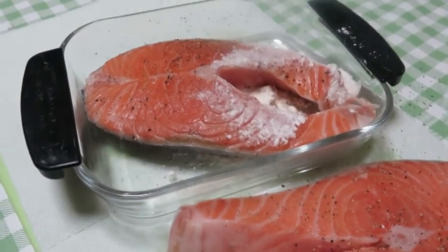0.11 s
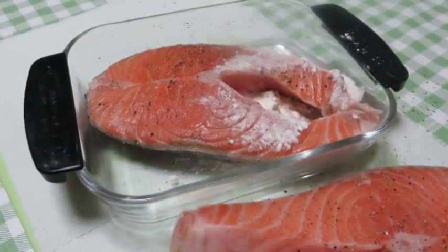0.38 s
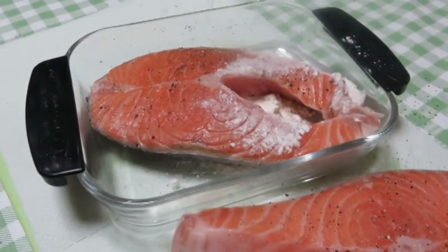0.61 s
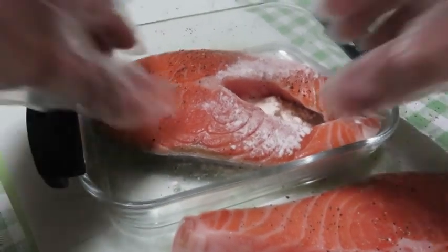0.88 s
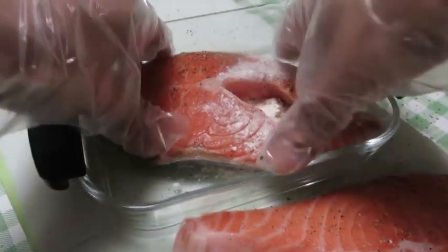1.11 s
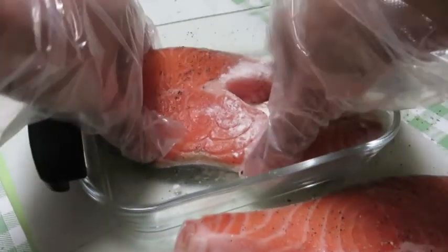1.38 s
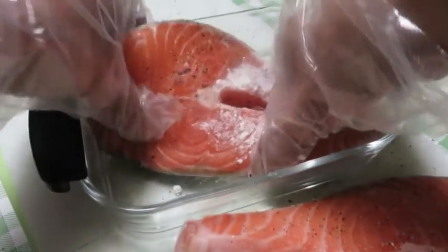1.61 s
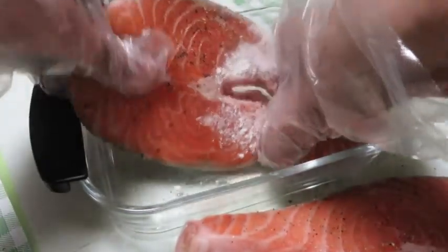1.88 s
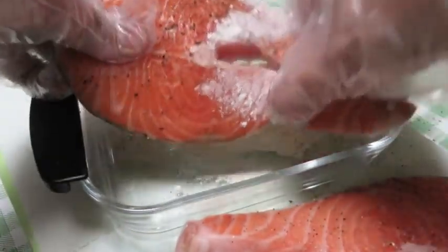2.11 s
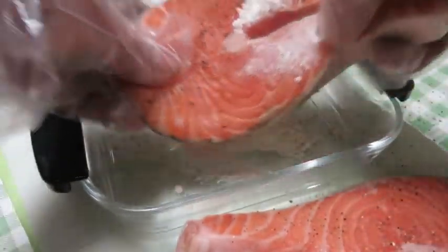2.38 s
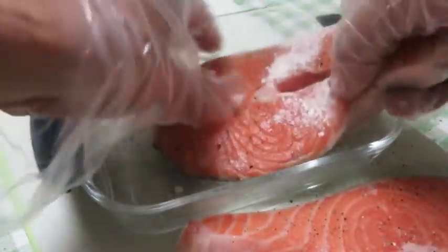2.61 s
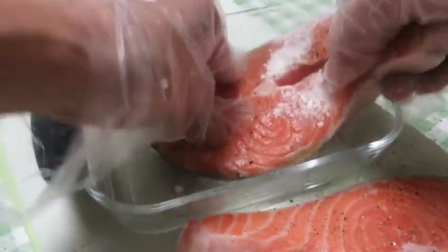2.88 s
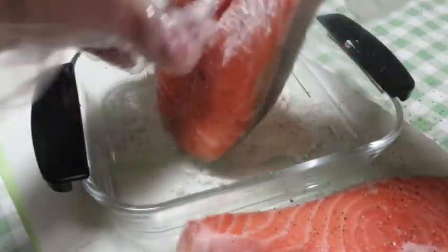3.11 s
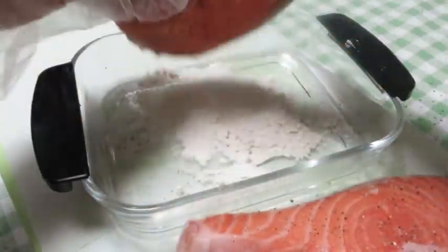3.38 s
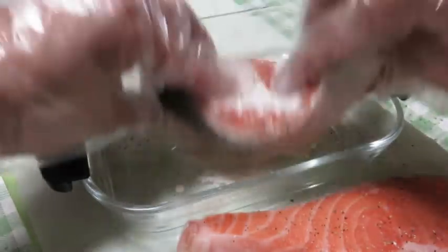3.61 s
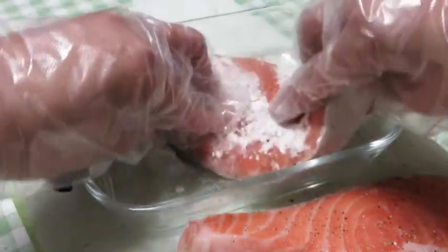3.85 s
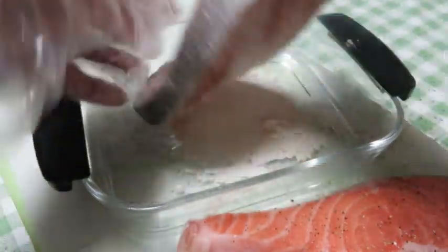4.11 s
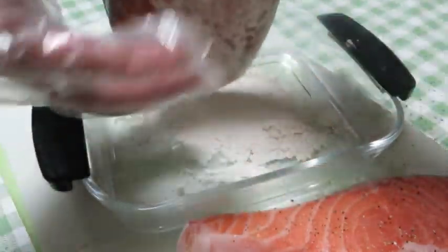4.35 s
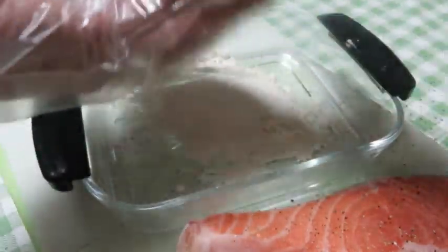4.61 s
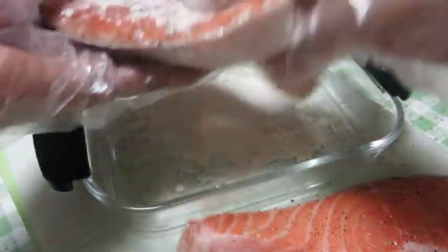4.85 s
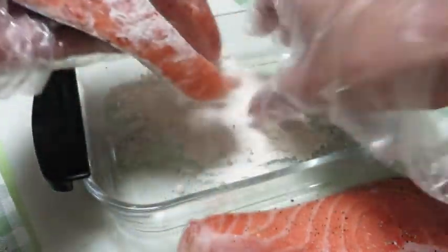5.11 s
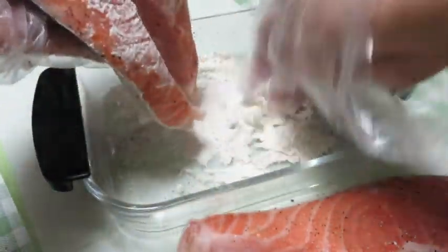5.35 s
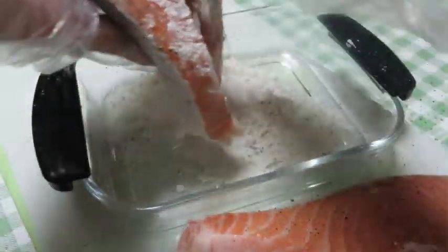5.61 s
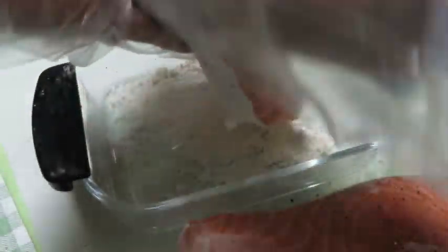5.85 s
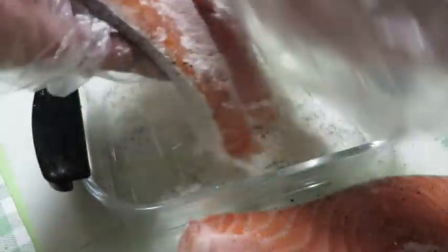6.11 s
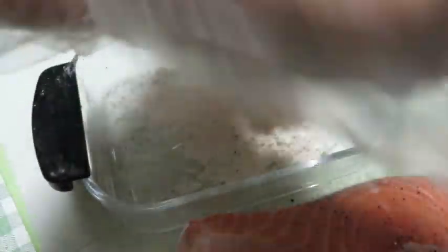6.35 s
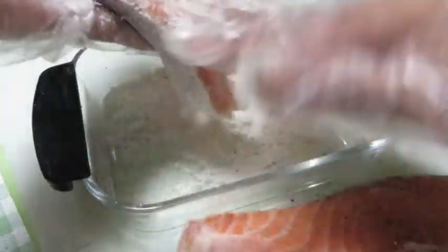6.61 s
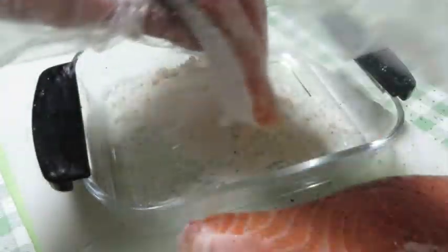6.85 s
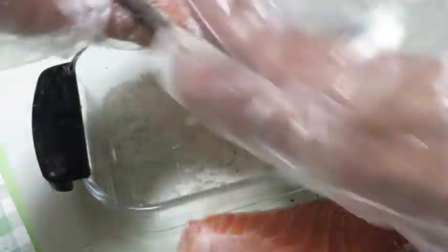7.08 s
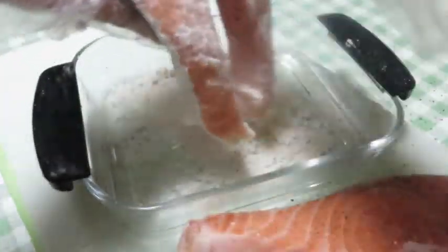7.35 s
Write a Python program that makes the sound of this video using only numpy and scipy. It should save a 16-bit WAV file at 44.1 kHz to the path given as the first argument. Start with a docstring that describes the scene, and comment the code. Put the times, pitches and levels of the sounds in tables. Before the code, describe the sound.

Crisp, crackling plastic film on busy hands rubbing flour onto fish, with two brief lulls, in a small quiet kitchen.

```python
"""Thin plastic gloves crinkle close to a camera while hands turn and rub a piece of fish over a glass dish.
It opens off to one side with separate snaps and a few low pats; within a second a dense rustle swells up.
Creases in the film buckle as short ringing clicks: fine ticks, broad folds, a dull palm and loud single snaps.
The rustle thins briefly near 4.1 s and eases near 6.3 s, then goes on to the end. Fingers pat the flesh and bump
the dish as damped low sines; filtered noise makes the rubbing rumble and the floor of a small quiet kitchen."""
import sys
import numpy as np
from scipy import signal
from scipy.fft import rfft, irfft, next_fast_len
from scipy.io import wavfile
from scipy.ndimage import map_coordinates

SR = 44100
rng = np.random.default_rng(int(sys.argv[2]) if len(sys.argv) > 2 else 0)


def nominal_scale(level):
    """Amplitude ratio for a level in decibels (scalar or array-like)."""
    x = np.asarray(level, float) / 20
    return 10 ** x


def put_to_file(sound):
    """Save the sound as 16-bit audio at rate SR, in the file named by the first command-line argument."""
    columns = np.atleast_2d(sound).T  # one column per channel
    safe = np.clip(columns, -1, 1)
    whole_steps = np.round(safe * 32767)
    wavfile.write(sys.argv[1], SR, whole_steps.astype(np.int16))


N = 329458


def unit(x):
    """Scaled to rms 1."""
    return x / np.sqrt(np.mean(x ** 2) + 1e-20)


def along(points, hz):
    """Reads (frequency [Hz], value) points on a log frequency axis."""
    f, v = np.transpose(points)
    return np.interp(np.log(hz + 1), np.log(f + 1), v)


def over_time(rows, s):
    """Each column after the time, read at the moments s."""
    at, *cols = np.transpose(rows)
    return [np.interp(s, at, c) for c in cols]


def wobble(rate):
    """A smooth random curve of rms 1, rate knots a second."""
    knots = rng.standard_normal(int(N * rate / SR) + 4)
    return unit(map_coordinates(knots, [np.arange(N) * rate / SR]))


def filtered(x, response):
    """Multiplies the spectrum of x by a complex response of frequency."""
    m = next_fast_len(N + 8192)
    return irfft(rfft(x, m) * response(np.fft.rfftfreq(m, 1 / SR)), m)[..., :N]


def noise(spectrum):
    """Unrelated mid and side noise of one colour, at rms 1."""
    return unit(filtered(rng.standard_normal((2, N)), lambda hz: nominal_scale(along(spectrum, hz))))


def radiated(x, low_hz):
    """A small patch of film moves little air at low pitch: a second-order high-pass."""
    return filtered(x, lambda hz: (1j * hz / (low_hz + 1j * hz)) ** 2)


def clicks(s, gain, hz, t60, aside, size, rise=0.0023):
    """Damped sines summed at their times; the side row weighs each by its direction."""
    t, t60 = np.arange(size) / SR, t60[:, None]
    swing = np.sin(2 * np.pi * np.clip(hz, 40, 16000)[:, None] * t)
    onset = 1 - np.exp(-t / (rise * t60))  # rise is a share of the ring time
    ring = swing * nominal_scale(-60 * t / t60) * onset * gain[:, None]
    start = np.round(np.clip(s, 0, N / SR) * SR).astype(int)
    at = (start[:, None] + np.arange(size)).ravel()
    return np.array([np.bincount(at, (ring * w).ravel(), N + size)[:N] for w in (1, aside[:, None])])


def crackle(centre_hz, octaves, cycles, spread_db, low_hz, rise, count, size):
    """Many creases buckle at random: log-normal pitch and ring time, exponential spread of level in dB."""
    u, z = rng.random((count, 2)), rng.standard_normal((count, 4))
    at = (u[:, 0] * N).astype(int)
    pitch = 2 ** (octaves * z[:, 0])
    size_db = spread_db * np.minimum(-np.log(1 - u[:, 1]), 4)
    gain = pitch ** 0.8 * nominal_scale(size_db) * np.sign(z[:, 2])  # quicker snaps push the air harder
    hz = centre_hz[at] * pitch
    life = cycles * np.exp(0.26 * z[:, 3]) / hz
    aside = 0.36 + 0.47 * z[:, 1]
    grains = radiated(clicks(at / SR, gain, hz, life, aside, size, rise), low_hz)
    return grains / np.std(grains[0])


def hands(now):
    """Hand motion: power of the steady rustle, level of the folds, and clumps shared by film and rumble."""
    # rustle of the moving hands: (time [s], drive of the creases [dB], broad folds against them [dB])
    motion = [(0, -52, 6.5), (.3, -57, -5), (.49, -52, 4.5), (.53, -47, 2.5), (.63, -62, -2),
              (.75, -52, -2.5), (.93, -37.5, -2.5), (1.15, -32.5, -4), (1.6, -29, -3.5), (2.1, -34, -5),
              (2.32, -36.5, -2), (2.45, -29.5, -3.5), (2.95, -29.5, -4), (3.08, -37.5, -4.5),
              (3.2, -29, -4.5), (3.95, -33.5, -6.5), (4.07, -49, -6), (4.135, -36.5, -1.5),
              (4.175, -30.5, -5), (4.6, -38.5, -3), (4.75, -33.5, -4.5), (5.75, -32.5, -6),
              (6.13, -32.5, -4.5), (6.24, -49, -4.5), (6.31, -74, -16), (6.4, -51, -2), (6.5, -28, -4.5),
              (6.68, -35, -4.5), (7.0, -35, -8), (7.2, -31, -4), (7.47, -36, -7.5)]
    rustle_db, folds_db = over_time(motion, now)
    steady = nominal_scale(1.969 * (rustle_db + 0.69 * wobble(45)))  # power, so nearly twice the dB
    clump_db = 0.3 * wobble(45) + 1.25 * wobble(130)
    return steady, folds_db, clump_db


def squeezes(now):
    """Power of the bursts as a grip crumples the film: each climbs to a peak and falls at a steady dB rate."""
    # grips: (time of the peak [s], level [dB], rise over 10 dB [s], fall over 10 dB [s])
    grips = [(.25, -44.5, 0.044, 0.017), (.59, -29, 0.059, 0.022), (.66, -25.5, 0.042, 0.031),
             (.96, -30.5, 0.16, 0.02), (1.19, -24.5, 0.16, 0.017), (1.31, -27, 0.19, 0.048),
             (1.44, -31.5, 0.037, 0.052), (1.71, -31, 0.14, 0.098), (1.88, -23, 0.074, 0.03),
             (1.98, -25, 0.14, 0.082), (2.09, -25, 0.055, 0.049), (2.43, -27.5, 0.091, 0.04),
             (2.465, -25.5, 0.025, 0.034), (2.505, -26, 0.03, 0.026), (2.76, -28, 0.059, 0.077),
             (2.9, -27, 0.058, 0.036), (2.97, -27, 0.039, 0.067), (3.18, -30, 0.027, 0.12),
             (3.3, -26, 0.048, 0.055), (3.62, -32.5, 0.089, 0.1), (3.86, -24.5, 0.04, 0.049),
             (3.998, -24, 0.055, 0.03), (4.017, -25.5, 0.023, 0.022), (4.229, -38, 0.12, 0.046),
             (4.41, -26.5, 0.027, 0.1), (4.68, -27, 0.016, 0.026), (4.77, -26.5, 0.026, 0.071),
             (4.866, -17.5, .004, 0.021), (4.925, -23.5, 0.12, 0.046), (4.98, -26.5, 0.05, 0.023),
             (5.089, -23, 0.046, 0.077), (5.28, -29, 0.88, 0.17), (5.453, -23.5, 0.063, 0.024),
             (5.54, -26.5, 0.033, 0.081), (5.998, -23, 0.16, 0.26), (6.44, -26.5, 0.015, 0.15),
             (6.563, -20, 0.022, 0.058), (6.86, -27, 0.085, 0.15), (7.05, -30.5, 0.016, 0.15),
             (7.133, -16, 0.019, 0.023), (7.23, -23.5, 0.043, 0.12), (7.37, -22, 0.03, 0.086),
             (7.449, -21, 0.0082, 0.035)]
    power = np.zeros(N)
    for s, db, rise, fall in grips:
        below_peak = np.maximum((s - now) / rise, (now - s) / fall)
        power += nominal_scale(2 * (db - 10 * below_peak))
    return power


def fine_creases(steady, burst):
    """Small creases tick high, with scattered middling pops among them."""
    # neighbouring creases share a patch of film, so their pitch drifts together
    centre_hz = 7000 * 2 ** (0.14 * wobble(40))
    ticks = crackle(centre_hz, 0.75, cycles=4.4, spread_db=1.6, low_hz=1560, rise=0.09, count=34000, size=96)
    pops = crackle(np.full(N, 8200), 0.53, cycles=4.5, spread_db=2.2, low_hz=2500, rise=0.044,
                   count=1100, size=128)
    ticks = np.sqrt(steady + burst) * nominal_scale(0.59 * wobble(25)) * ticks
    return ticks + np.sqrt(steady + 0.35 * burst) * nominal_scale(-6) * pops


def broad_folds(steady, burst, folds_db):
    """Larger bends of the film ring lower and longer, as a crunch."""
    centre_hz = 2650 * 2 ** (0.16 * wobble(22))
    folds = crackle(centre_hz, 0.5, cycles=8.2, spread_db=0.5, low_hz=800, rise=0.06, count=11000, size=256)
    strength = np.sqrt(steady + nominal_scale(2 * -1) * burst)  # bursts count 1 dB less here
    return strength * nominal_scale(folds_db + 0.31 * wobble(25)) * folds


def palm_crunch(steady, burst, folds_db):
    """The palm of the glove flexes as one sheet: a dull crunch under the creases."""
    centre_hz = 902 * 2 ** (0.26 * wobble(12))
    crunch = crackle(centre_hz, 0.53, cycles=5.3, spread_db=-0.5, low_hz=300, rise=0.089, count=6000, size=384)
    return np.sqrt(steady + burst) * nominal_scale(folds_db - 14.5 + 2.44 * wobble(8)) * crunch


def snaps():
    """A loud crease buckles: a sharp click and a shorter one near its pitch, then smaller ones as it settles."""
    # loudest single creases: (time [s], level [dB], pitch [Hz])
    creases = [(0.0782, -8.5, 6800), (.0953, -13.5, 6750), (.107, -35, 5940), (.124, -23, 9000),
               (.1354, -21.5, 4140), (.2165, -24, 4020), (0.2496, -21, 2710), (0.2562, -17, 4430),
               (0.337, -11.5, 3900), (.347, -23, 1500), (.365, -19.5, 4230), (0.4189, -17.5, 5130),
               (0.476, -21, 2820), (0.5083, -0.5, 5150), (0.5127, -15, 6540), (.517, -15, 5400),
               (0.5213, -5.5, 8800), (.5314, -16, 5200), (.552, -11.5, 2450), (.555, -21, 4900),
               (.5898, -8.5, 1830), (.5915, -3.5, 6000), (.6181, -20, 5600), (.65, -6, 5560),
               (1.0006, -8.5, 6900), (1.107, -9, 2980), (1.181, -3, 4800), (1.234, -10, 10800),
               (1.247, -6, 10500), (1.28, -7, 9400), (1.306, -9, 8000), (1.41, -7, 8800),
               (1.426, -10, 10000), (1.77, -7, 10400), (1.9787, -6, 8100), (2.0528, -10, 5500),
               (2.1505, -13, 8500), (2.1694, -5.5, 4830), (2.179, -15, 4300), (2.373, -8, 9500),
               (2.5123, -10, 8200), (2.8612, -22, 7100), (2.882, -10, 5000), (2.901, -7, 7000),
               (2.907, -8, 7500), (2.926, -6.5, 5000), (3.041, -8, 8700), (3.088, -9, 5170),
               (3.128, -8, 7700), (3.143, -16, 2280), (3.161, -4, 10500), (3.161, -6, 4770),
               (3.2084, -12, 7500), (3.3154, -5, 7450), (3.326, -8, 9000), (3.357, -11, 8500),
               (3.7015, -5, 9900), (3.8149, -10, 8200), (3.94, -8.5, 8540), (4.018, -11, 3000),
               (4.049, -14.5, 8000), (4.0947, -20, 7800), (4.103, -16, 7740), (4.121, -18, 7000),
               (4.144, -11.5, 7000), (4.1511, -8, 7200), (4.1555, -9, 9600), (4.16, -15, 9500),
               (4.2017, -5, 6500), (4.225, -11, 7000), (4.243, -16, 7500), (4.3326, -6, 8150),
               (4.672, -7, 9100), (4.7192, -5, 9500), (4.8625, -6, 7300), (4.8648, -9, 9500),
               (4.867, -14, 7240), (4.898, -12, 3000), (4.929, -12, 9000), (4.985, -9, 5930),
               (5.006, -14, 9000), (5.2135, -11, 6740), (5.227, -6, 9300), (5.271, -8, 6200),
               (5.2757, 0.5, 7460), (5.4502, -6, 3270), (5.5407, -14, 8300), (5.738, -6.5, 9200),
               (5.805, -11, 6800), (5.9305, -3, 5600), (5.9945, -3, 7500), (6.0304, -4, 2610),
               (6.0463, -2, 6200), (6.07, -10, 6200), (6.117, -3, 8400), (6.139, -12, 7500),
               (6.1475, -9, 9700), (6.351, -26, 9550), (6.359, -25, 9500), (6.364, -30, 7000),
               (6.371, -23, 4900), (6.379, -19, 8850), (6.38, -18, 2950), (6.398, -21, 4320),
               (6.41, -16, 7000), (6.414, -14, 5500), (6.5763, 1, 5370), (6.8208, -19, 5660),
               (6.8625, -7, 3830), (6.9026, -11, 6100), (6.941, -12, 9500), (6.98, -15, 8000),
               (7.01, -11, 6530), (7.1658, -3, 7200), (7.3062, -1, 6500), (7.3707, -6, 6500)]
    s, db, hz = np.transpose(creases)
    # (usual delay [s], level against the crease [dB], pitch scatter [octaves], ring time [cycles])
    stages = [(0, 3, 0.04, 7), (0, -2, 0.27, 2.3), (0.0002, -5.5, 0.3, 5), (0.0005, -4, 0.33, 6),
              (0.001, -8.5, 0.3, 6), (0.002, -12, 0.25, 6)]
    out = 0
    for late, stage_db, octaves, cycles in stages:
        z = rng.standard_normal((len(s), 3))
        pitch = hz * 2 ** (octaves * z[:, 0])
        at = s + late * np.exp(0.48 * z[:, 1])
        aside = 0.62 + 0.53 * z[:, 2]
        out = out + clicks(at, nominal_scale(db + stage_db), pitch, cycles / pitch, aside, size=256, rise=0.044)
    return radiated(out, low_hz=940)


def runs(count=24):
    """One fold gives way in a run of small ringing cracks, scattered over its length close to one pitch."""
    # giving folds: (time [s], length [s], usual level of a crack [dB], pitch [Hz])
    giving = [(1.14, 0.065, -29, 2650), (1.29, 0.028, -16, 3720), (1.83, 0.093, -23, 1240),
              (2.41, 0.022, -23, 3420), (2.453, .018, -22.5, 2300), (2.495, 0.012, -18, 2770),
              (2.77, 0.013, -19, 3220), (2.88, 0.03, -15.5, 2310), (3.14, 0.0091, -23.5, 2170),
              (4.235, 0.016, -22, 3000), (1.05, 0.09, -32, 1270), (5.92, 0.07, -16, 2100),
              (5.96, 0.1, -23, 1500), (5.98, 0.1, -19, 3300), (6.15, 0.14, -26, 2500),
              (6.43, 0.088, -29, 1510), (6.55, 0.026, -14.5, 1930), (7.124, 0.021, -12.5, 2380),
              (7.148, 0.017, -18, 3000), (7.44, 0.022, -15, 3650)]
    s, length, db, hz = np.repeat(giving, count, axis=0).T
    u, z = rng.random(len(s)), rng.standard_normal((len(s), 3))
    pitch = hz * 2 ** ((0.11 + 0.77 * length) * z[:, 0])  # a longer run wanders further
    gain = nominal_scale(db + 1.3 * z[:, 1])
    aside = 0.23 + 0.24 * z[:, 2]
    return clicks(s + length * u, gain, pitch, 14 / pitch, aside, size=512, rise=0.081)


def pats():
    """A gloved finger lands on flesh or glass: a few low cycles with a soft start."""
    # soft pats and bumps: (time [s], relative level [dB], pitch [Hz], ring time t60 [s])
    landings = [(.189, -31.5, 630, 0.0081), (0.249, -30, 960, 0.014), (.419, -36, 594, 0.011),
                (0.476, -29, 422, 0.012), (0.587, -13, 1140, 0.0041), (0.59, -21, 405, 0.012),
                (0.596, -12.5, 124, 0.0068), (.652, -19, 780, 0.009), (.662, -23, 774, 0.015),
                (.605, -28, 620, 0.018), (.665, -25, 295, 0.014), (.681, -23, 596, 0.01),
                (1.106, -36, 206, 0.086), (2.772, -26, 187, 0.036), (2.78, -33, 45, 0.13),
                (2.838, -23.5, 1140, 0.01), (2.84, -23, 196, 0.034), (2.841, -26.5, 427, 0.015),
                (4.029, -14, 1340, 0.0055), (4.467, -25.5, 176, 0.05), (5.44, -33.5, 254, 0.054),
                (7.135, -27.5, 630, 0.03)]
    s, db, hz, t60 = np.transpose(landings)
    aside = np.full(len(s), 0.4)
    thud = clicks(s, nominal_scale(db + 6.0), hz, np.maximum(t60, 0.004), aside, size=4096, rise=0.073)
    return radiated(thud, low_hz=45)


def rubbing(now, steady, burst, clump_db):
    """Hands on flesh and table: low noise that partly follows the loudness of the film."""
    # colour of the rumble: (frequency [Hz], relative level [dB])
    colour = [(15, -51), (28, -7), (70, -4.5), (151, -2.5), (210, 2), (445, -4), (741, -4.5), (1170, -28),
              (1980, -33)]
    # strength of the rubbing: (time [s], level [dB])
    strength = [(0.0, -44.5), (0.35, -46.5), (0.62, -45.5), (1.18, -50.5), (2.33, -53.5), (2.83, -50.5),
                (4.14, -50.5), (4.83, -50.5), (5.66, -56), (6.05, -46.5), (6.26, -51.5), (6.56, -49.5),
                (6.9, -53.5), (7.47, -51)]
    rub_db, = over_time(strength, now)
    effort_db = 10 * np.log10(steady + burst)
    pressing_db = rub_db + 0.47 * (effort_db - effort_db.mean())
    return nominal_scale(pressing_db + 1.4 * clump_db + 2.6 * wobble(10)) * noise(colour)


def walls(x):
    """The kitchen answers with a noise tail in which each frequency dies at its own speed."""
    # decay of the room: (frequency [Hz], t60 [s])
    decay = [(200, 0.26), (2000, 0.32), (10000, 0.11)]
    hz, t, z = signal.stft(rng.standard_normal((2, SR // 2)), SR, nperseg=256)
    fading = z * nominal_scale(-60 * t / along(decay, hz)[:, None])
    tail = signal.istft(fading, SR, nperseg=256)[1]
    return signal.fftconvolve(x[None], tail / np.linalg.norm(tail[0]), axes=1)[:, :N]


def kitchen():
    """Steady floor of the quiet room: coloured noise."""
    # colour of the floor: (frequency [Hz], relative level [dB])
    colour = [(18, -38), (30, -17), (571, 1), (1660, 0), (3060, -3.5), (10900, -34), (13000, -30)]
    return nominal_scale(-51) * noise(colour)


def scene():
    """All sources as mid and side, turned into left and right."""
    # hands off to the side of the camera: (time [s], share [0-1])
    off_centre = [(0, 0.48), (.5, 0.45), (.56, 0.63), (.88, 0.77), (1.02, 0), (6.3, 0.07), (6.56, 0.27),
                  (6.7, 0.04), (7.47, 0.01)]
    # side against mid of the two microphone ports: (frequency [Hz], relative level [dB])
    width = [(30, -30), (60, -28), (110, -12), (200, -11.5), (380, -4), (700, -7.5), (1290, -15.5),
             (2380, -27), (4400, -15.5), (8120, -2.5), (15000, 4)]
    now = np.arange(N) / SR
    steady, folds_db, clump_db = hands(now)
    burst = squeezes(now)
    film = fine_creases(steady, burst) + broad_folds(steady, burst, folds_db)
    film = nominal_scale(clump_db) * (film + palm_crunch(steady, burst, folds_db))
    near = film + snaps() + runs() + pats()

    away = np.clip(over_time(off_centre, now)[0], 0, 1)
    dull = filtered(near, lambda hz: 1 / (1 + (hz / 9500) ** 8))  # the top treble is duller while the hands are off to the side
    near = away * dull + (1 - away) * near
    # a source off centre reaches one port first, which turns the side's phase [rad]
    near[1] = filtered(near[1], lambda hz: np.exp(1.35j * np.ones_like(hz)))

    rumble = rubbing(now, steady, burst, clump_db)
    mid, side = near + nominal_scale(-12.5) * walls(near[0]) + rumble + kitchen()
    ports = filtered(side, lambda hz: nominal_scale(along(width, hz) + 1.0))
    side = ports + away * nominal_scale(-1.0) * side  # wider while the hands are off to the side
    return np.array([mid + side, mid - side])


def band_limit(x):
    """A steep low-pass at the top of the band."""
    return signal.sosfilt(signal.butter(12, 16530, fs=SR, output="sos"), x)


def record(dry):
    """Microphone colour, then an input stage that rounds off the tallest peaks."""
    # microphone response: (frequency [Hz], gain [dB])
    response = [(25, -7), (70, 2.5), (500, 1.2), (1000, 2.5), (2000, -1.16), (4000, -1), (7000, 1),
                (10000, 2), (12000, 0), (13500, -8.5), (14500, -23), (16000, -34), (16600, -60)]
    x = filtered(dry, lambda hz: nominal_scale(along(response, hz)))
    mix = x / (1 + np.abs(x / 0.9) ** 3) ** (1 / 3)  # never beyond 0.9
    return band_limit(mix)


dry = scene()
out = record(dry)
put_to_file(out)
```